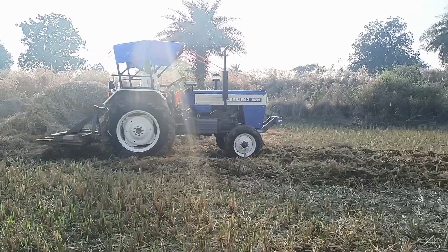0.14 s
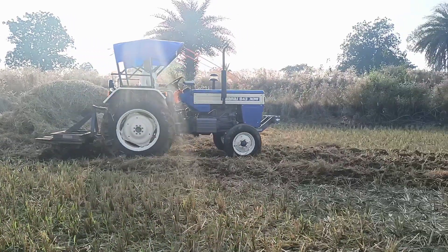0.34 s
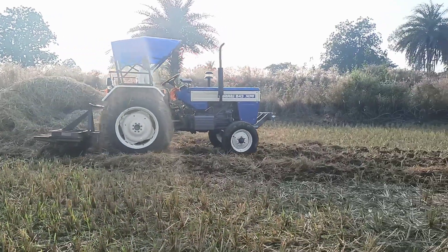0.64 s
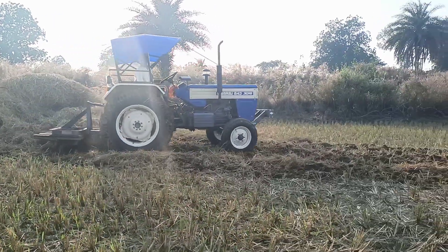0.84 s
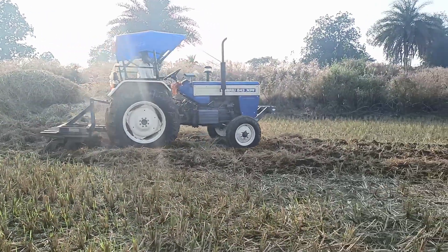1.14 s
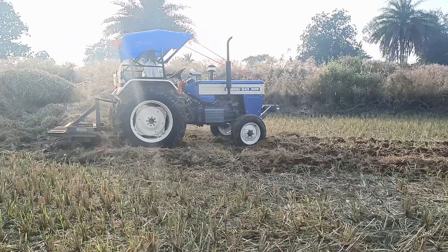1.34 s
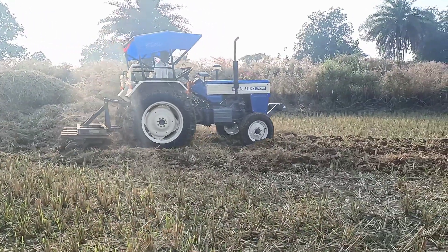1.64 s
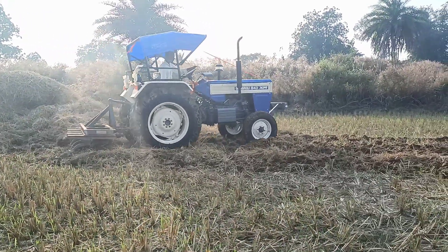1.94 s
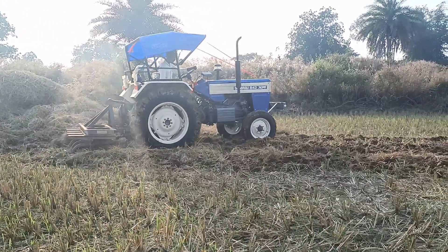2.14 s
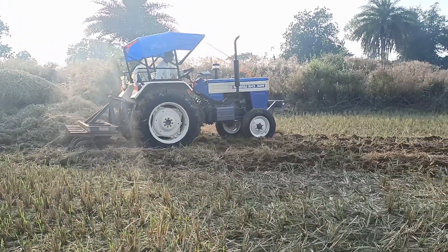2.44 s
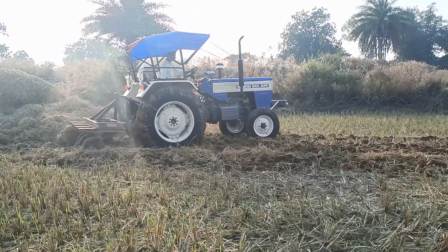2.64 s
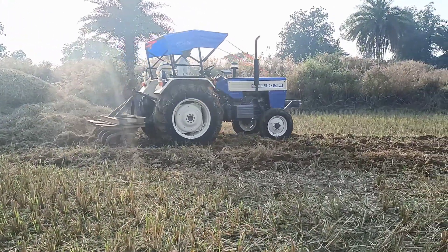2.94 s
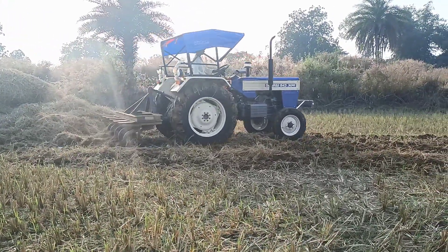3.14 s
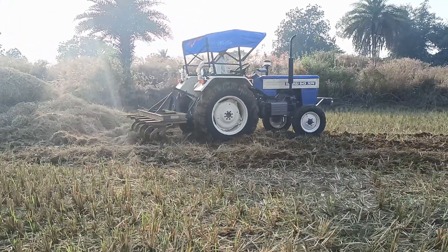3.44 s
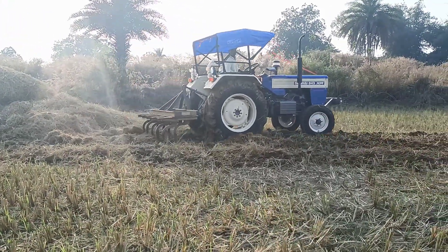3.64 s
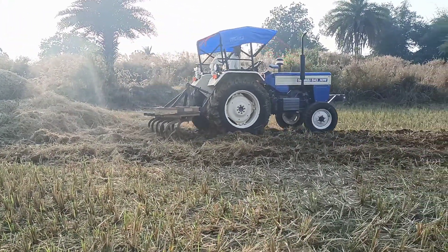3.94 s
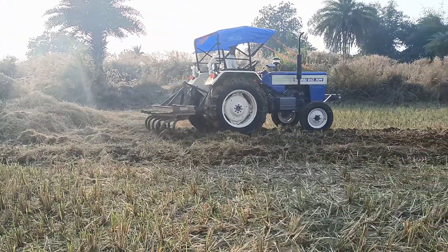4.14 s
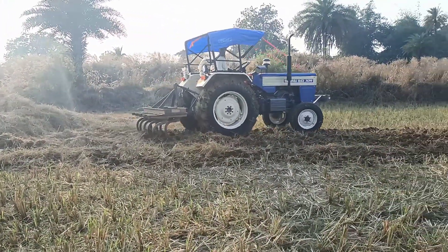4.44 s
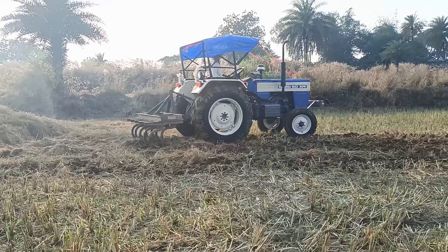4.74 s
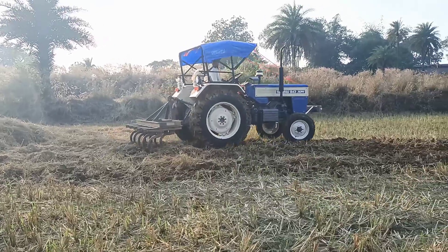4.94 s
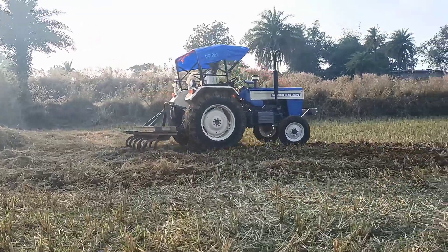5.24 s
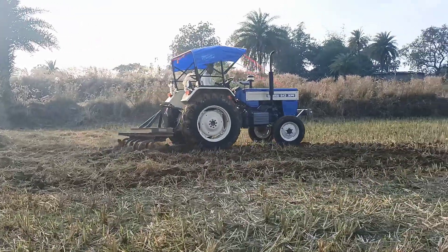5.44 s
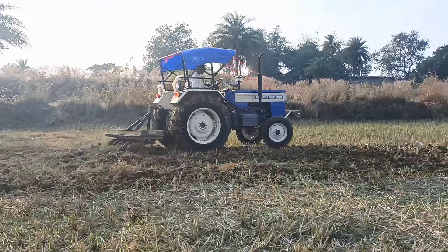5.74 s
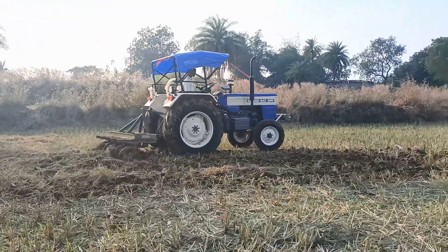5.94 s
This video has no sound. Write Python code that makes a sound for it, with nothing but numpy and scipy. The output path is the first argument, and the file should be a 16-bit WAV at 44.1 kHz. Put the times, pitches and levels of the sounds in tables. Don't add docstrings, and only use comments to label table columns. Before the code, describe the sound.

A diesel tractor drags a cultivator over dry stubble in the open, about twenty metres from a small stereo handset. From the start it pulls hard: rapid low thumps around 44 per second, knocking block, puffing bright exhaust hiss, rumbling tyres and a brief gear whine. At about 0.5 s the load dips, returning by 0.8 s; thin breathy whistles colour the exhaust until 3.5 s. From about 2.4 to 3.3 s the engine labours lower, with a faint rattle and a squeak near 2.8 s. At 3.5 s the power cuts and revs jump; a sharp double metal clank lands at 3.7 s with small squeaks. It rolls quieter until 4.6 s, then surges unevenly over grinding soil. Close straw snaps and rustles, strongest left, at 5.1-5.7 s among squeaks and rattles. Full load returns near 5.8 s, with whine and link chatter to the end at 6.1 s.

```python
import sys
import numpy as np
from scipy import signal
from scipy.fft import rfft, irfft, next_fast_len
from scipy.io import wavfile

SR = 44100
rng = np.random.default_rng(int(sys.argv[2]) if len(sys.argv) > 2 else 0)


def volts(x):
    e = np.asarray(x, float) / 20
    return 10 ** e


def pcm_store(signal):
    levels = np.round(np.clip(np.atleast_2d(signal), -1, 1) * 32767)
    wavfile.write(sys.argv[1], SR, levels.astype(np.int16).T)


N = 268569
TIME = np.arange(N) / SR
SIZE = next_fast_len(N + 4096)
BINS = np.maximum(np.arange(SIZE // 2 + 1) * SR / SIZE, 1)


def rms_one(x):
    return x / np.sqrt(np.mean(x ** 2) + 1e-20)


def in_time(rows):
    s, *columns = np.transpose(rows)
    return [np.interp(TIME, s, c) for c in columns]


def at_hz(points, hz, column=1):
    points = np.array(points)
    return np.interp(np.log(hz), np.log(points[:, 0]), points[:, column])


def drift(rate_hz):
    r = np.exp(-2 * np.pi * 40 * rate_hz / SR)
    slow = signal.lfilter([1], [1, -2 * r, r * r], rng.standard_normal(N // 40 + 2002))[2000:]
    return np.interp(np.arange(N) / 40, np.arange(len(slow)), rms_one(slow))


def swells(table):
    return sum(volts(db) * np.sin(np.pi * np.clip((TIME - s) / length, 0, 1)) for s, length, db in table)


def narrow(x, hz, width_hz):
    r = np.exp(-np.pi * width_hz / SR)
    poles = [1, -2 * r * np.cos(2 * np.pi * hz / SR), r * r]
    return signal.lfilter([(1 - r * r) / 2, 0, (r * r - 1) / 2], poles, x)


def tones(table, width_hz):
    out = np.zeros(N)
    for s, length, hz, db in table:
        start, size = round(s * SR), round(length * SR)
        noise = rng.standard_normal(SR)[:size + 2000]
        tone = rms_one(narrow(narrow(noise, hz, width_hz), hz, width_hz)[2000:])
        out[start:start + size] += (volts(db) * tone * signal.windows.tukey(size, .6))[:N - start]
    return out * volts(2 * drift(60))


# f/Hz, likeness (0 to 1)
LIKENESS = [(100, .999), (300, 0.97), (700, 0.92), (1400, 0.69), (2800, 0.66), (6000, 0.13), (15000, 0.44)]


def stereo_noise(spectrum):
    mid, side = rfft(rng.standard_normal((2, SIZE)))
    alike = np.clip(at_hz(LIKENESS, BINS), 0, 1)
    ports = np.sqrt(1 + alike) * mid + np.sqrt(1 - alike) * side * [[1], [-1]]
    return rms_one(volts(at_hz(spectrum, BINS)) * ports) * np.sqrt(SIZE)


def bands(pair, low_hz, high_hz, count):
    centres = np.geomspace(low_hz, high_hz, count)
    for k, hz in enumerate(centres):
        share = np.interp(np.log(BINS), np.log(centres), np.arange(count) == k)
        yield hz, irfft(pair * share, SIZE)[:, :N]


# t/s, fuel level/dB re full load
FUEL = [(0, 0), (.33, 0), (.49, -10), (.75, -1), (1.1, 1), (1.6, -1.5), (3.46, 0), (3.54, -20),
        (4.62, -20.5), (4.74, -4), (4.86, -8), (5.07, -18), (5.16, -9), (5.31, -8), (5.46, -18), (5.6, -8),
        (5.76, 0), (6.09, 0)]
FUEL_STEPS_DB = [-20, -10, 0]


def by_fuel(levels_db):
    return np.interp(in_time(FUEL)[0], FUEL_STEPS_DB, levels_db)


# t/s, firing rate f/Hz
SPEED = [(0.0, 44.41), (0.24, 44.69), (0.382, 47.59), (0.672, 44.59), (1.04, 44.88), (1.212, 43.25),
         (1.483, 45.27), (2.399, 43.38), (2.813, 36.1), (3.214, 39.43), (3.628, 54.5), (3.716, 47.92),
         (4.317, 50.49), (4.652, 43.05), (4.702, 46.25), (5.483, 46.95), (5.564, 45.9), (6.09, 43.46)]
FIRST_FIRING = .38


def engine():
    cycles = FIRST_FIRING + np.cumsum(in_time(SPEED)[0]) / SR
    return cycles, np.flatnonzero(np.diff(np.floor(cycles - .5)))


def lugging():
    return np.minimum(in_time(SPEED)[0] - 44, 0)


# level/dB at overrun, part and full load
ORDER_DB = [(-38, -33, -26), (-37, -29, -25.5), (-43, -33.5, -26.5)]
# order, level/dB re the third
HIGH_ORDERS = [(5, -19), (6, -24)]
# t/s, length/s, level/dB
REBOUNDS = [
    (3.57, 0.15, -30.5),
    (4.08, 0.23, -44),
]
LUG_DB_PER_HZ = 0.75


def thump(cycles):
    lug_db = LUG_DB_PER_HZ * lugging()
    turn = 2 * np.pi * (cycles - .5) + 0.049 * drift(2.4)
    levels = [(k + 1, by_fuel(row) + lug_db) for k, row in enumerate(ORDER_DB)]
    third_db = levels[-1][1]
    levels += [(order, third_db + db) for order, db in HIGH_ORDERS]
    swing = swells(REBOUNDS) * (np.cos(turn) + .4 * np.cos(2 * turn))
    pulse = sum(volts(db + 0.29 * drift(41.0)) * np.cos(order * (turn - 0.029 * (order - 1)))
                for order, db in levels)
    return -np.sqrt(2) * (swing + pulse)


# f/Hz, level/dB per Hz
RUMBLE_COLOUR = [(30, -45), (60, -14), (100, -8), (150, 0), (200, -1.5), (270, -1.5), (330, -19),
                 (500, -89)]
SHAFT_THIRDS = [7, 10, 11, 12, 13, 14, 16, 17]
SHAFT_DB = [-28, -60, -1, 4, -2, -10, -64, -24]
RUMBLE_DB = (-36.5, -36.5, -38)


def rumble(cycles):
    lumps = volts(-2 + drift(8)) * irfft(stereo_noise(RUMBLE_COLOUR), SIZE)[:, :N]
    lines = sum(volts(db + 3.1 * drift(0.32)) * np.sin(2 * np.pi * third / 3 * cycles + drift(6.2))
                for third, db in zip(SHAFT_THIRDS, SHAFT_DB))
    return volts(by_fuel(RUMBLE_DB) - 8.5) * (lumps + lines)


# band f/Hz, lag t/s, time to peak t/s
PUFF = [(500, -.0075, .0060), (1300, -.0050, .0050), (2500, -.0035, .0040), (6000, -.0040, .0040),
        (12000, -.0052, .0033)]
LEAK_DB = -15.5


def puffs(firings, hz, strength_db):
    clicks = np.zeros(N)
    at = np.clip(firings + round(at_hz(PUFF, hz) * SR), 0, N - 1)
    clicks[at] = volts(strength_db)
    r = np.exp(-2 / (at_hz(PUFF, hz, column=2) * SR))
    peak_one = np.e ** 2 / 2 * (1 - r) ** 2
    return volts(LEAK_DB) + signal.lfilter([peak_one], np.poly([r, r, r]), clicks + 1e-18)


PATCH_DB, PATCHES_PER_S = 1.6, 1.5


def gated(spectrum, low_hz, high_hz, firings, shared_db, own_db, shade_db):
    eddies = volts(0.6 * drift(89.0))
    out = 0
    for hz, noise in bands(stereo_noise(spectrum), low_hz, high_hz, count=14):
        strength_db = shared_db + own_db * rng.standard_normal(len(firings))
        patches_db = PATCH_DB * drift(PATCHES_PER_S)
        out = out + noise * puffs(firings, hz, strength_db) * volts(shade_db * (hz < 7500) + patches_db)
    return 2 * eddies * out


PIPE_HZ = [4700, 5500, 7060, 8550, 8600, 9800, 10600, 12000, 12100, 13200, 14200]


def pipe_modes(firings):
    out = 0
    for hz in PIPE_HZ:
        mode = rms_one(narrow(rng.standard_normal(N), hz, .015 * hz)) * volts(5 * drift(2))
        out = out + mode * puffs(firings, hz, 3 * rng.standard_normal(len(firings)))
    return out


# f/Hz, level/dB per Hz
HISS_COLOUR = [(2500, -37), (3900, -6.5), (4700, 5.5), (6000, 10.5), (7400, 12), (8500, 12.5), (10500, 4),
               (12000, 3.5), (16500, 3)]
HISS_DB = (-90, -51.5, -41)
# t/s, length/s, f/Hz, level/dB
WHISTLES = [(.02, .3, 6050, -37), (.05, .25, 5600, -41), (.93, .2, 5550, -35), (.98, .45, 6130, -33),
            (1.3, .8, 5770, -44), (1.8, .5, 6850, -40), (2.1, .85, 6580, -31), (2.9, .35, 6150, -38),
            (3.38, .12, 6800, -33)]
HISS_LUG_DB_PER_HZ = 0.2
SHADE_DB_PER_S = -0.46
PIPE_DB = -7.5
WHISTLE_WIDTH_HZ = 110


def exhaust(firings, shared_db):
    level_db = by_fuel(HISS_DB) + HISS_LUG_DB_PER_HZ * lugging()
    hiss = gated(HISS_COLOUR, 4600, 16000, firings, shared_db, own_db=2.5, shade_db=SHADE_DB_PER_S * TIME)
    modes = pipe_modes(firings)
    whistles = volts(16.5) * tones(WHISTLES, WHISTLE_WIDTH_HZ)
    blown = puffs(firings, 1700, 1.37 * rng.standard_normal(len(firings)))
    return volts(level_db) * hiss + volts(level_db + PIPE_DB) * modes + whistles * blown


# f/Hz, level/dB per Hz
KNOCK_COLOUR = [(180, -43), (300, -16), (726, -3), (942, -18.5), (1250, 0), (1470, -15.5), (2390, 0),
                (3130, -14), (4500, -17.5), (5850, -42), (9900, -120)]
KNOCK_DB = (-45.5, -39, -31.5)
FADE_DB_PER_S = -1.07


def knock(firings, shared_db):
    level_db = by_fuel(KNOCK_DB) + FADE_DB_PER_S * TIME - 9.0
    return volts(level_db) * gated(KNOCK_COLOUR, 393, 3880, firings, shared_db, own_db=-1.5, shade_db=1.0)


# f/Hz, level/dB per Hz
GEAR_COLOUR = [(200, -18), (330, -9), (600, -5.5), (800, 1), (1000, -10.5), (1200, 3.5), (1500, -6),
               (1800, 3.5), (2100, -7), (2500, -2), (3600, -12.5), (5000, -13.5), (8000, -7.5),
               (16500, -28)]
GEAR_DB = (-33.5, -33.5, -31.5)
# t/s, length/s, level/dB re the running gear
DIGS = [
    (1.9, 0.53, -14),
    (4.85, 1.0, -8.5),
]
GEAR_FLICKER_DB = 2.06


def running_gear():
    together = drift(45.0)
    noise = sum(band * volts(GEAR_FLICKER_DB * (0.25 * together + drift(22.6)) + drift(0.79))
                for hz, band in bands(stereo_noise(GEAR_COLOUR), 272, 16800, count=10))
    return volts(by_fuel(GEAR_DB) - 12.0) * (1 + swells(DIGS)) * noise


GROUND_S, GROUND_DB, GROUND_CUT_HZ = 0.00169, -15, 1340


def ground(x):
    echo = signal.lfilter(*signal.butter(1, GROUND_CUT_HZ, fs=SR), x)
    return x + volts(GROUND_DB) * np.roll(echo, round(GROUND_S * SR), axis=-1)


# t/s, length/s, level/dB
WHINES = [
    (-.05, .32, -19),
    (1.55, 0.95, -29.5),
    (5.76, 0.36, -25),
]
WHINE_ORDER = 16.45


def whine(cycles):
    level = swells(WHINES) * volts(3 * drift(15) - 1)
    return level * np.sin(2 * np.pi * WHINE_ORDER * cycles + .5 * drift(15))


# f/Hz, level/dB per Hz
AIR_COLOUR = [(3000, 7), (6000, -22.5), (9000, -15.5), (12000, -11), (15000, 14), (16500, 9.5)]
AIR_DB = -61


def field():
    return volts(AIR_DB) * sum(noise * volts(1.5 * drift(6.0))
                             for hz, noise in bands(stereo_noise(AIR_COLOUR), 4000, 15000, count=6))


# t/s, length/s, f/Hz, level/dB
SQUEAKS = [(2.83, .05, 4560, -21), (3.648, 0.067, 3620, -24.5), (3.655, 0.049, 7240, -27),
           (3.675, 0.049, 3820, -25), (3.9, .08, 10500, -40), (3.92, 0.058, 3610, -26),
           (3.965, .04, 3620, -30), (5.135, 0.035, 3870, -16.5), (5.19, .032, 3520, -24.5),
           (5.43, .06, 2300, -14.5), (5.83, 0.11, 3400, -26), (5.92, 0.23, 3350, -26.5)]
# t/s, length/s, f/Hz, level/dB
RATTLES = [(2.3, 0.35, 3070, -34.5), (2.55, 0.32, 2870, -31.5), (2.82, 0.12, 2660, -21),
           (5.3, 0.1, 2600, -26), (5.44, 0.075, 2650, -22.5), (5.62, 0.051, 2600, -25),
           (5.905, 0.055, 2330, -18), (5.92, 0.025, 2840, -21), (5.995, 0.053, 2380, -16.5),
           (6.06, .05, 1920, -17), (6.06, 0.036, 2820, -50)]
SQUEAK_WIDTH_HZ, RATTLE_WIDTH_HZ = 125, 270


def linkage():
    return tones(SQUEAKS, SQUEAK_WIDTH_HZ) + tones(RATTLES, RATTLE_WIDTH_HZ)


# t/s, level/dB
CLANK = [
    (3.706, -21),
    (3.712, -4),
    (3.719, -21),
    (3.732, -9),
    (3.748, -12),
]
# f/Hz, level/dB, t60/s
FRAME = [(515, -7, 0.15), (672, -2, 0.2), (1265, 12.5, 0.1), (1606, -1, 0.29), (1860, 3.5, 0.15),
         (2300, 9, 0.046), (2650, -1, 0.045), (3620, -16, 0.065), (5200, -15, .06)]


def clank():
    s, db = np.transpose(CLANK)
    since = np.maximum(TIME - s[0], 0)
    mid_band = signal.butter(2, [1050, 2900], "band", fs=SR, output="sos")
    crash = signal.sosfilt(mid_band, rng.standard_normal(N))
    out = volts(6.0) * crash * since / 0.014 * np.exp(-since / 0.011)
    out += volts(-40) * rng.standard_normal(N) * (since > 0) * np.exp(-since / .03)
    for hz, level_db, t60 in FRAME:
        clicks = np.zeros(N)
        clicks[(s * SR).astype(int)] = volts(db + level_db - 16.5 + 2 * rng.standard_normal(len(s)))
        r, w = volts(-60 / (t60 * SR)), 2 * np.pi * hz / SR
        out += signal.lfilter([0, np.sin(w)], [1, -2 * r * np.cos(w), r * r], clicks + 1e-18)
    return out


# f/Hz, level/dB per Hz
STRAW_COLOUR = [(3500, -16), (5200, -5.5), (7000, -1.5), (10000, -8.5), (12000, -6.5), (13500, 0),
                (15000, 0.5), (16500, -38)]
# t/s of peak, level/dB
BRUSHES = [
    (5.14, -46),
    (5.225, -54),
    (5.422, -40),
    (5.49, -46.5),
    (5.66, -43),
]
# t/s, level/dB over the rustle
SNAPS = [(5.134, 12), (5.174, 17), (5.2175, 20), (5.4152, 20), (5.4186, 11), (5.422, 4), (5.433, 5),
         (5.4875, 7)]
BRUSH_RISE_DB_PER_S, BRUSH_FALL_DB_PER_S = 350, 87


def straw():
    noise = irfft(stereo_noise(STRAW_COLOUR), SIZE)[:, :N]
    level = 0
    for s, db in BRUSHES:
        slope_db = np.minimum(BRUSH_RISE_DB_PER_S * (TIME - s), BRUSH_FALL_DB_PER_S * (s - TIME))
        level = level + volts(db + slope_db)
    crackle = volts(2 * drift(100))
    for at, over_db in SNAPS:
        crackle = crackle + volts(over_db) * (TIME > at) * np.exp(-np.abs(TIME - at) / .0007)
    return noise * level * crackle * volts(np.array([[0], [-6.0]]))


def scene():
    cycles, firings = engine()
    shared_db = 1.2 * rng.standard_normal(len(firings))
    reflected = ground(exhaust(firings, shared_db) + knock(firings, shared_db) + running_gear())
    implement = linkage() + clank()
    tractor = thump(cycles) + rumble(cycles) + reflected + whine(cycles)
    return tractor + implement + straw() + field()


def low_pass(x):
    return signal.sosfilt(signal.butter(12, 16750, fs=SR, output="sos"), x)


# f/Hz, phase/rad
LEAD = [(0, 0), (2330, 0.1), (3450, -1.4), (3700, -2.1), (4820, -3.2), (6120, -7.0), (7670, -13.2),
        (10500, -15.8), (11700, -16.6), (14200, -15.0), (14500, -14.3), (14700, -15.8), (15500, -11.1),
        (16300, -12.2)]
# f/Hz, left level/dB, right level/dB
PORTS = [(95.6, -2.32, -3), (1200, -14.5, -14), (2600, -7.5, -16), (3670, -4.5, -7), (4280, -8, -8.5),
         (5630, -10.5, -16), (7250, -15, -26), (7270, -37, -18), (9700, -19, -9), (9600, -6.5, -17.5),
         (10700, -8, -5), (12600, -3.5, -8), (14150, -6, -50), (17600, -6.5, -48)]
CUTOFF_HZ = np.array([[15700], [13700]])


def record(dry):
    lead = np.interp(BINS, *np.transpose(LEAD))
    colour = volts(np.array([at_hz(PORTS, BINS), at_hz(PORTS, BINS, column=2)]))
    ports = colour * np.exp(.5j * lead * [[1], [-1]])
    ports = ports / (1 + (BINS / CUTOFF_HZ) ** np.array([[600], [120]]))
    mix = irfft(rfft(dry, SIZE) * ports, SIZE)[:, :N]
    return low_pass(mix)


dry = scene()
out = record(dry)
pcm_store(out)
```